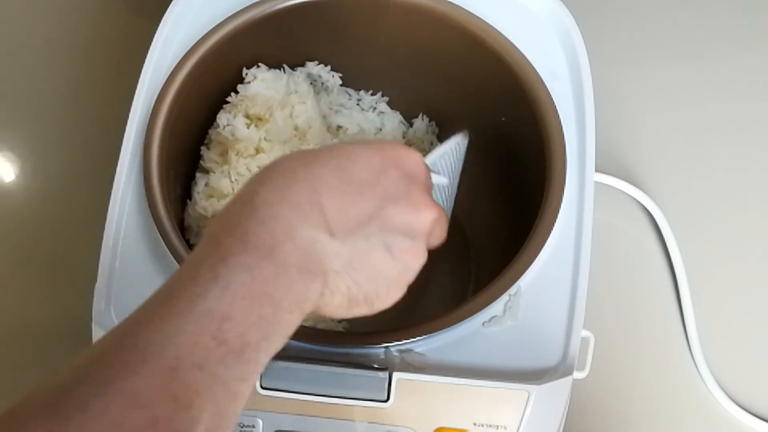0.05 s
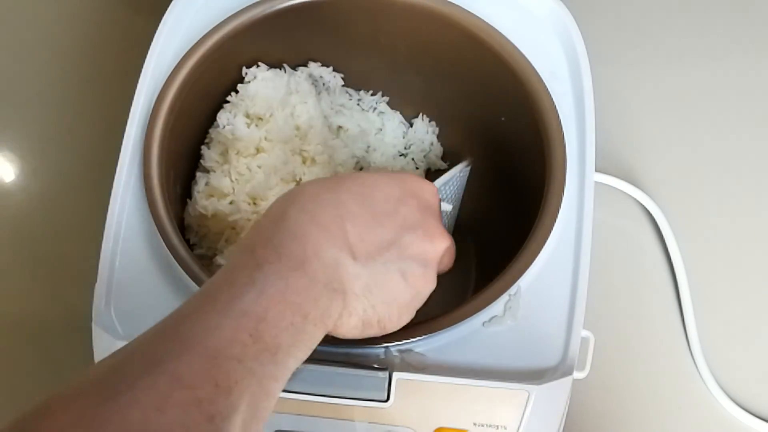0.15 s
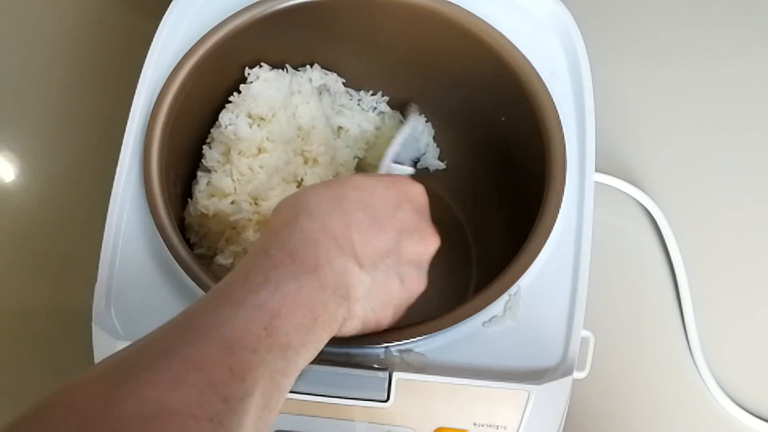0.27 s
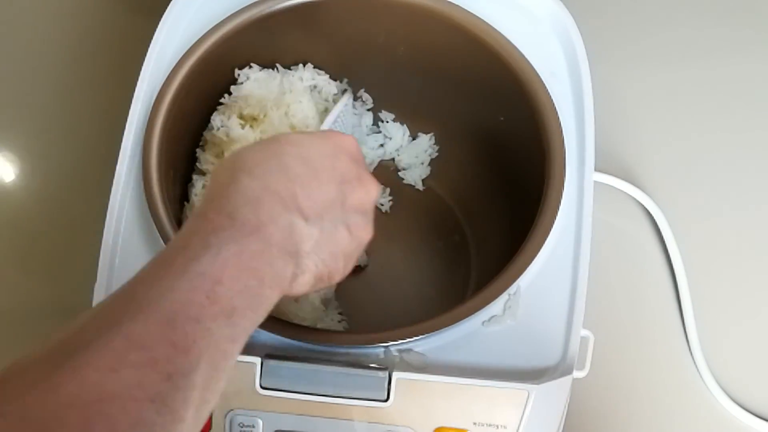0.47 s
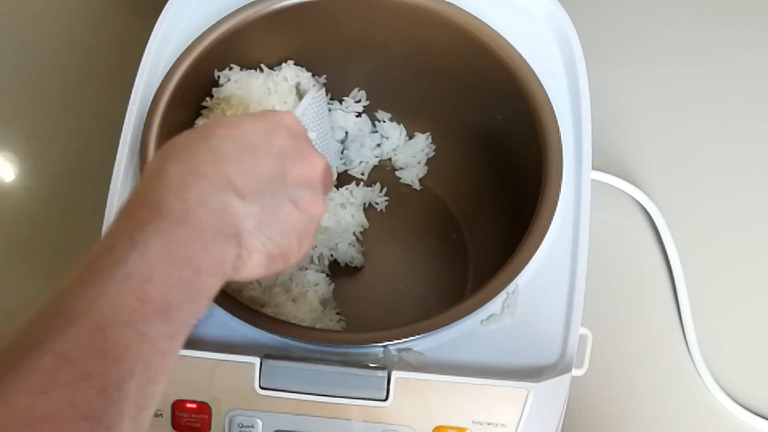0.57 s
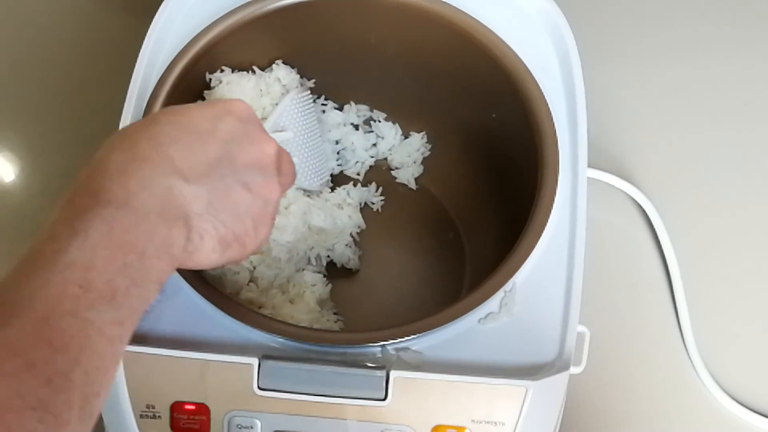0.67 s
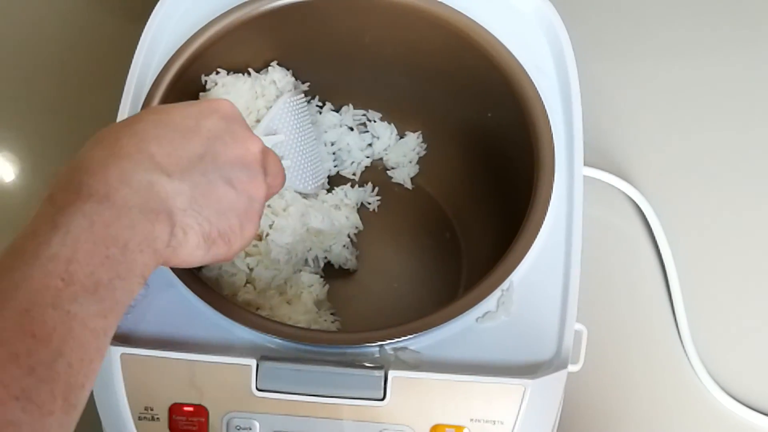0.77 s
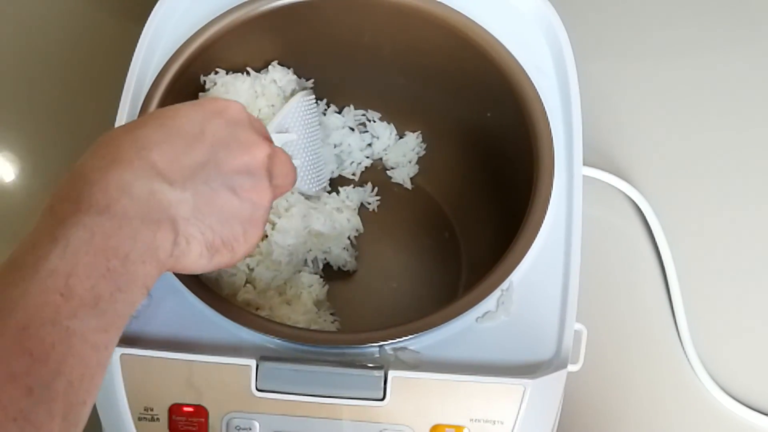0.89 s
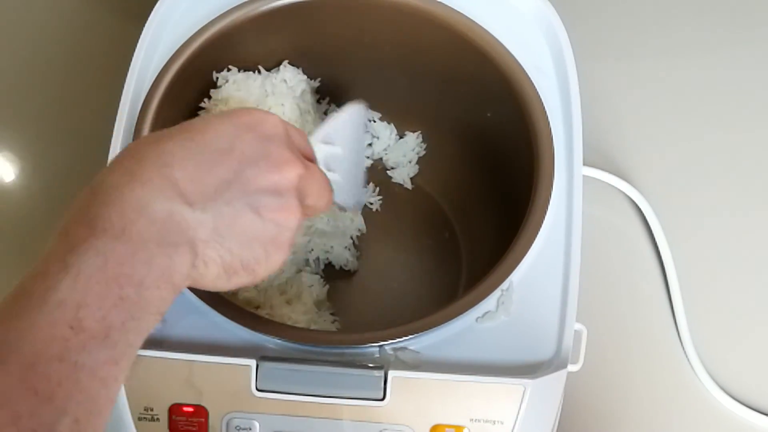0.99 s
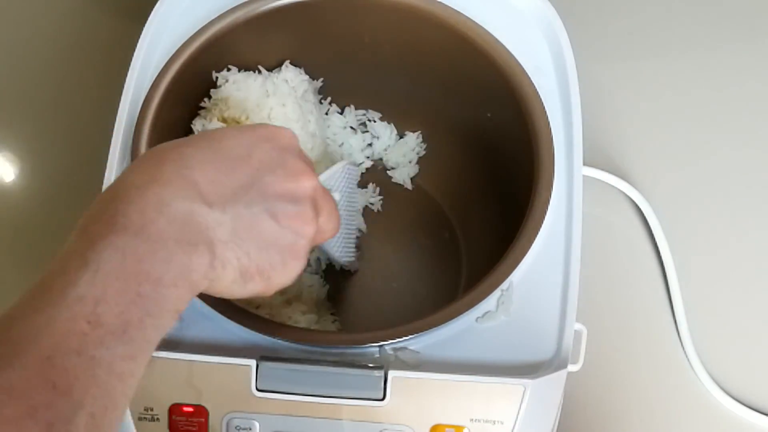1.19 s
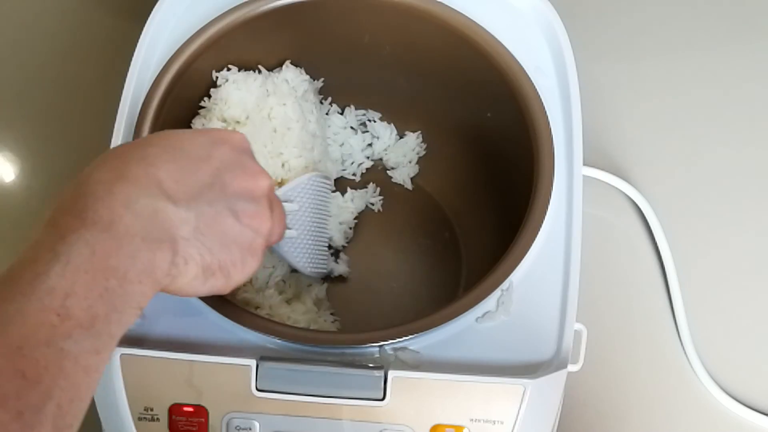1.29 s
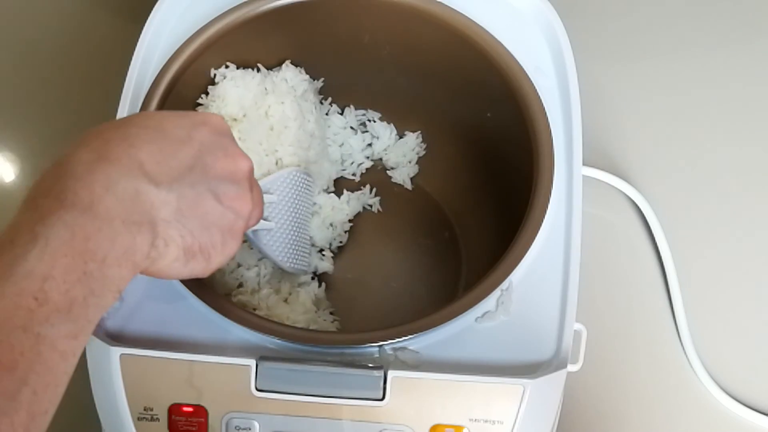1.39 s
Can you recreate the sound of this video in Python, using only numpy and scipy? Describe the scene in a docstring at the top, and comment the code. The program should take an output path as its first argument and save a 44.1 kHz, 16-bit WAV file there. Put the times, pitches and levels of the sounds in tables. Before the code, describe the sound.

Close up in a small kitchen, a plastic paddle hits a metal cooker pot with one hollow clack and scrapes quickly along its wall. Afterwards sticky rice rustles and ticks faintly over a low hum and room noise.

```python
"""A paddle in a rice cooker

A plastic paddle knocks against the metal pot of a rice cooker, then scrapes briefly along its wall.
The impact excites the modes of paddle, pot and housing: a crack, a ring and a boom, to which a small
kitchen adds its reverberation. The paddle stirs the soft rice faintly, and sticky grains tick as they
let go. Beneath it all lie the low, swelling hum of an appliance and the noise of the room."""
import sys
import numpy as np
from scipy import signal
from scipy.fft import rfft, irfft, next_fast_len
from scipy.io import wavfile
from scipy.ndimage import map_coordinates

SR = 44100
rng = np.random.default_rng(int(sys.argv[2]) if len(sys.argv) > 2 else 0)


def store_pcm(level_fs):
    """Save levels as 16-bit WAV."""
    pcm = np.round(np.clip(level_fs, -1, 1) * 32767).astype(np.int16)
    wavfile.write(sys.argv[1], SR, np.atleast_2d(pcm).T)


N = 63945

KNOCK_S = .2402
# Coherence of the room's sound field. Each row: frequency in Hz, left-right correlation.
ROOM_COHERENCE = [(120, .99), (250, 0.54), (400, -0.35), (700, -0.49), (1100, 0), (1550, -0.041),
                  (2300, -.1), (4000, -0.039)]


def amp(db):
    """Amplitude ratio of a level in decibels."""
    return 10 ** (np.asarray(db) / 20)


def unit(x):
    """Normalisation to an rms of 1."""
    return x / np.sqrt(np.mean(x ** 2) + 1e-20)


def along(points, hz):
    """Interpolation of (Hz, value) points on a logarithmic frequency axis."""
    freqs, values = np.transpose(points)
    return np.interp(np.log(hz + 1), np.log(freqs + 1), values)


def since(start):
    """Seconds elapsed since start, zero before it."""
    return np.maximum(np.arange(N) / SR - start, 0)


def fade(t, t60):
    """Exponential free decay, 60 dB in t60 seconds."""
    return np.exp(-np.log(1000) * t / t60)


def swell(peak_s, rise, fall):
    """Gaussian envelope of a stroke, with separate widths before and after its peak."""
    t = np.arange(N) / SR - peak_s
    return np.exp(-.5 * (t / np.where(t < 0, rise, fall)) ** 2)


def wobble(rate):
    """Smooth random modulation: a spline through rate knots a second."""
    knots = rng.standard_normal(int(N * rate / SR) + 4)
    return map_coordinates(knots, [np.arange(N) * rate / SR])


def grains(rate, scatter_db):
    """Shot noise: two trains of tiny slips of random size, on average rate a second."""
    occurs = rng.random((2, N)) < rate / SR
    return occurs * rng.standard_normal((2, N)) * amp(scatter_db * rng.standard_normal((2, N)))


def filtered(x, response):
    """Linear filtering: the spectrum of x times a frequency response."""
    size = next_fast_len(N + SR // 2)
    return irfft(rfft(x, size) * response(np.fft.rfftfreq(size, 1 / SR)), size)[..., :N]


def coloured(pair, spectrum, coherence):
    """Mid-side mixing gives two independent signals this spectrum and coherence, at an rms of 1."""
    def response(hz):
        angle = np.arccos(np.clip(along(coherence, hz), -1, 1)) / 2
        return amp(along(spectrum, hz)) * [np.cos(angle), np.sin(angle)]
    mid, side = filtered(pair, response)
    return unit(np.array([mid + side, mid - side]))


def minimum_phase(spectrum, size=4096):
    """Folding the cepstrum gives a causal impulse response of energy 1 with this spectral shape."""
    cepstrum = irfft(np.log(amp(along(spectrum, np.fft.rfftfreq(size, 1 / SR)))))
    cepstrum[1:size // 2] *= 2
    cepstrum[size // 2 + 1:] = 0
    response = irfft(np.exp(rfft(cepstrum)))
    return response / np.linalg.norm(response)


def appliance_hum(pitch_hz=48.3, waver_rad=.083):
    """Amplitude modulation: a deep tone swells and sinks beneath faint overtones of steady level."""
    # Envelope of the deep tone. Each row: time in seconds, level in dB.
    envelope = [(0, -61.5), (.12, -74), (.2, -83), (.29, -68), (.34, -59.5), (.42, -65), (.47, -55.5),
                (.53, -51.5), (.61, -55), (.65, -58.5), (.76, -58), (.85, -54), (.92, -55), (1.1, -53),
                (1.2, -68), (1.235, -68), (1.27, -62.5), (1.45, -57.5)]
    # Overtones of the hum. Each row: frequency in Hz, level in dB.
    overtones = [(96.6, -75.5), (193.5, -78.5), (241.8, -70.5), (317.6, -83), (393, -83.5), (818, -90)]
    t = since(0)
    tone = lambda hz: np.sqrt(2) * np.sin(2 * np.pi * (hz * t + rng.random()) + waver_rad * wobble(14))
    deep = amp(np.interp(t, *np.transpose(envelope))) * tone(pitch_hz)
    return deep + sum(amp(db) * tone(hz) for hz, db in overtones)


def room_noise(level_db=-64):
    """Stationary background noise, strongest in the bass and partly coherent between the channels."""
    # Spectrum of the background. Each row: frequency in Hz, relative density in dB.
    spectrum = [(20, -25), (45, -9), (75, -13.5), (104, -17), (135, -25), (230, -23.5), (350, -29),
                (421, -22.5), (598, -35), (826, -33), (2500, -38), (8130, -40), (11000, -45),
                (15500, -47.5)]
    return amp(level_db) * coloured(rng.standard_normal((2, N)), spectrum, ROOM_COHERENCE)


def stirring(push_db=-70):
    """Granular friction: sticky grains part softly in a few light strokes and one long, dull push."""
    # Strokes through the rice. Each row: peak time in seconds, level in dB, rise and fall in seconds.
    strokes = [(.17, -74, 0.051, 0.15), (.78, -74, 0.026, 0.043), (1.035, -70, 0.016, 0.049),
               (1.29, -70, 0.019, 0.071)]
    # Spectra of the light strokes and of the push. Each row: frequency in Hz, relative level in dB.
    stroke_spectrum = [(300, 4), (1200, -4.5), (2500, -6), (4000, -1.5), (5500, -5), (8500, -3),
                       (12000, -17), (15000, -23.5)]
    push_spectrum = [(150, -10), (320, 15), (450, 4.5), (600, -2), (1200, -1), (2600, 1.5), (4500, -11),
                     (8000, -14), (13000, -36)]
    rustle = lambda spectrum: coloured(grains(rate=6000, scatter_db=-.5), spectrum, ROOM_COHERENCE)
    push = amp(push_db) * swell(peak_s=.73, rise=.14, fall=.12) * rustle(push_spectrum)
    envelope = sum(amp(db) * swell(peak_s, rise, fall) for peak_s, db, rise, fall in strokes)
    return push + envelope * rustle(stroke_spectrum)


def paddle_crack():
    """Heavy damping: each contact rings the plastic for only milliseconds, heard as a crack."""
    # Modes of the paddle. Each row: frequency in Hz, level before filtering in dB, T60 in seconds.
    modes = [(470, -22.5, .017), (1060, -19, .022), (1700, -22, .014), (2000, -26, .016),
             (3700, -27.5, .008), (6200, -27, .007), (9200, -28.5, .011)]
    # The blow and its rebound. Each row: start in seconds, gain in dB, leftward pan in dB.
    contacts = [(.2402, 0, 1.5), (.2503, -14, 6)]
    # Passband of the crack: lower and upper edge in Hz.
    band_hz = [275, 8800]
    crack = np.zeros((2, N))
    for start, gain_db, pan_db in contacts:
        t = since(start)
        ring = sum((-1) ** k * amp(db) * fade(t, t60) * np.sin(2 * np.pi * hz * t)
                   for k, (hz, db, t60) in enumerate(modes))
        crack += ring * amp(gain_db + pan_db * np.array([[1], [-1]]))
    return signal.sosfilt(signal.butter(2, band_hz, "bandpass", fs=SR, output="sos"), crack)


def clatter(level_db=-27.5, t60=.11):
    """Modal overlap: crowded, quickly damped resonances of paddle and housing merge into a noise burst."""
    # Spectral envelope of the resonances. Each row: frequency in Hz, relative level in dB.
    spectrum = [(80, -22.5), (130, -13), (250, -10), (370, -5.5), (490, -5), (640, 0.5), (730, -12.5),
                (930, 1.5), (1300, -5), (1600, 4), (2050, 0), (2280, -11), (2800, -9.5), (3600, -6),
                (5500, -8), (7800, -13.5), (9300, -9), (10500, -20), (14000, -42)]
    t = since(KNOCK_S)
    burst = rng.standard_normal((2, N)) * (t > 0) * fade(t, t60)
    return amp(level_db) * signal.fftconvolve(burst, minimum_phase(spectrum)[None], axes=1)[:, :N]


def pot_ring(gain_db=-1.5, attack_s=.0039, spread_rad=.81, waver_rad=.19):
    """Modal ringing: the pot's modes, unsteady under the paddle, reach the two sides out of phase."""
    # Modes of the metal pot. Each row: frequency in Hz, relative level in dB, T60 in seconds.
    modes = [(300, -42, .42), (428, -49, .45), (642, -37.5, .22), (870, -41, .22), (936, -37, .24),
             (1061, -27, .245), (1100, -35, .26), (1741, -31, .16), (1915, -40, .18), (1992, -39, .14),
             (3187, -44, .19), (3954, -44, .15), (5450, -48, .14), (9175, -49, .13)]
    t = since(KNOCK_S)
    ring = np.zeros((2, N))
    for k, (hz, db, t60) in enumerate(modes):
        phase = spread_rad * rng.choice([-1, 1]) * np.array([[1], [-1]]) + waver_rad * wobble(60)
        ring += (-1) ** k * amp(gain_db + db) * fade(t, t60) * np.sin(2 * np.pi * hz * t + phase)
    return ring * (1 - np.exp(-t / attack_s))


def housing_boom(hz=172.6, level_db=-38.5, rise_s=.025, decay_after_s=.063, t60=.095, waver_rad=.053):
    """Resonance: one low mode of the housing builds up, holds and decays."""
    t = since(KNOCK_S)
    envelope = np.minimum(t / rise_s, 1) * fade(since(KNOCK_S + decay_after_s), t60)
    return amp(level_db) * envelope * np.sin(2 * np.pi * hz * t + waver_rad * wobble(124))


def kitchen(x, delay_s=.006):
    """Reverberation: convolution with a diffuse tail in which each frequency decays at its own rate."""
    # Initial spectrum of the tail. Each row: frequency in Hz, relative level in dB.
    spectrum = [(150, 4.5), (380, 2), (500, -0.5), (700, 2.5), (1050, 1.5), (2000, -1), (4000, 1),
                (9000, -4)]
    # Reverberation times of the kitchen. Each row: frequency in Hz, T60 in seconds.
    decay_times = [(150, 0.7), (500, 0.48), (2000, 0.42), (5000, 0.31), (9000, 0.58), (15000, .28)]
    diffuse = coloured(rng.standard_normal((2, N)), spectrum, ROOM_COHERENCE)
    hz, t, bands = signal.stft(diffuse, SR, nperseg=256)
    tail = signal.istft(bands * fade(t, along(decay_times, hz)[:, None]), SR, nperseg=256)[1]
    tail = np.pad(tail / np.linalg.norm(tail[0]), ((0, 0), (round(delay_s * SR), 0)))
    return signal.fftconvolve(x, tail, axes=1)[:, :N]


def scrape(level_db=-44.5):
    """Stick-slip friction: the paddle's edge slides along the pot's wall in dense little slips."""
    # Response of the scraped wall. Each row: frequency in Hz, relative level in dB.
    wall = [(150, -6), (420, 3.5), (750, -6.5), (1000, 5), (1400, -2.5), (2000, 1.5), (2450, -7),
            (2950, -4.5), (3300, 1), (4000, -2), (4550, 3.5), (5600, -9), (6400, -5), (7600, -8.5),
            (9200, -9), (12000, -16), (15000, -32)]
    slips = coloured(grains(rate=8600, scatter_db=3), wall, coherence=[(300, .94), (1500, .15), (6000, .25)])
    return amp(level_db) * swell(peak_s=.3681, rise=.016, fall=.021) * slips


def grain_ticks(t60=.028, relative_width=.25):
    """Adhesion fails: single grains let go of the paddle, each with a burst of band-limited noise."""
    # Releases of sticky grains. Each row: start in seconds, level in dB, centre frequency in Hz.
    releases = [(0.4765, -60.5, 7500), (.86, -68, 1680), (1.286, -65, 4000)]
    ticks = np.zeros((2, N))
    for start, db, centre_hz in releases:
        t = since(start)
        band = lambda hz: np.exp(-.5 * ((hz / centre_hz - 1) / relative_width) ** 2)
        noise = unit(filtered(rng.standard_normal((2, N)), band))
        ticks += amp(db) * noise * (t > 0) * fade(t, t60)
    return ticks


def scene(knock_send_db=-8, scrape_send_db=-6.5):
    """Superposition of all sources; crack, clatter and scrape also excite the room."""
    background = appliance_hum() + room_noise()
    rice = stirring() + grain_ticks()
    knock = paddle_crack() + clatter()
    ringing = pot_ring() + housing_boom()
    slide = scrape()
    reverberation = kitchen(amp(knock_send_db) * knock + amp(scrape_send_db) * slide)
    return background + rice + knock + ringing + slide + reverberation


def record(dry):
    """Band limiting: an ideal low-pass filter removes everything above 15.7 kHz."""
    return filtered(dry, lambda hz: hz < 15700)


dry = scene()
out = record(dry)
store_pcm(out)
```